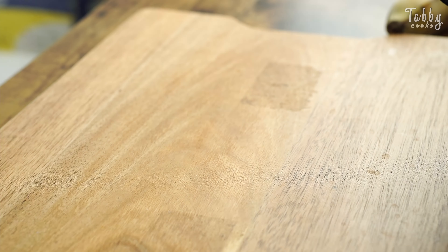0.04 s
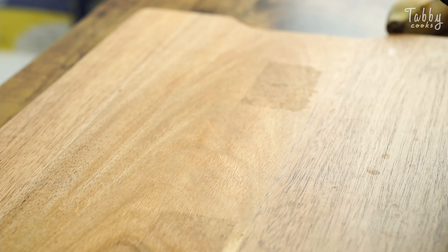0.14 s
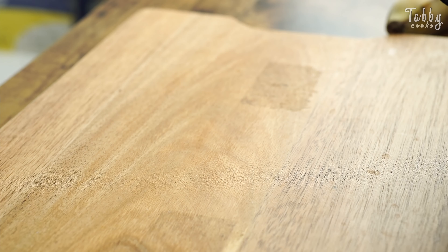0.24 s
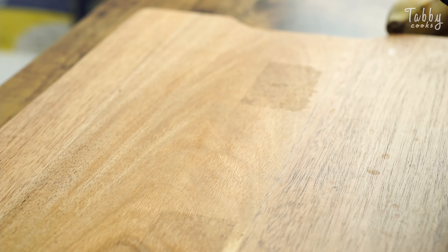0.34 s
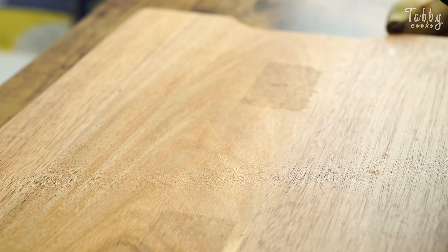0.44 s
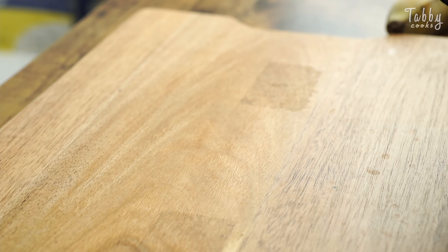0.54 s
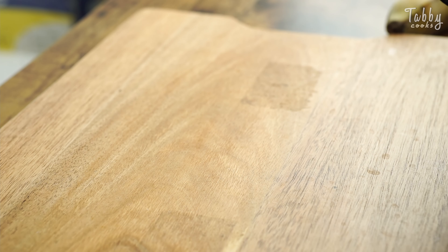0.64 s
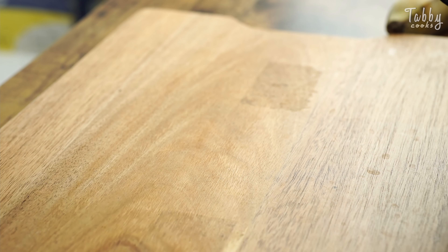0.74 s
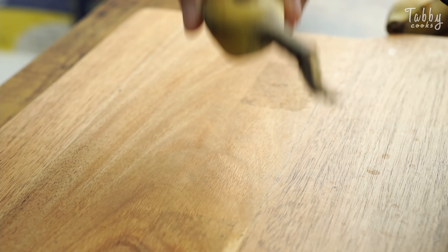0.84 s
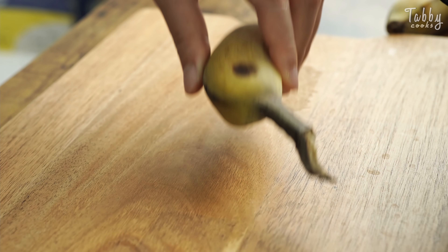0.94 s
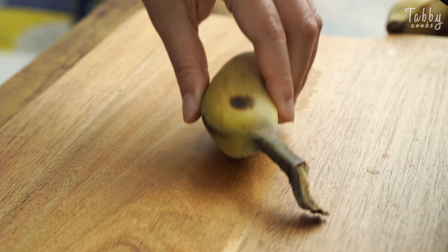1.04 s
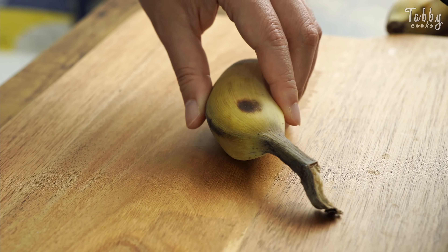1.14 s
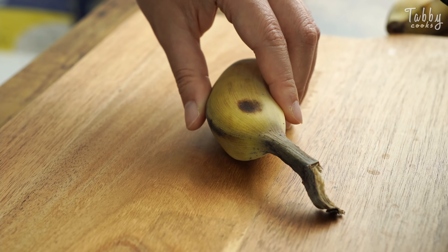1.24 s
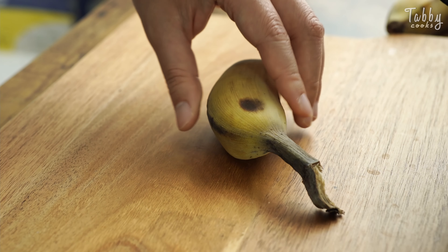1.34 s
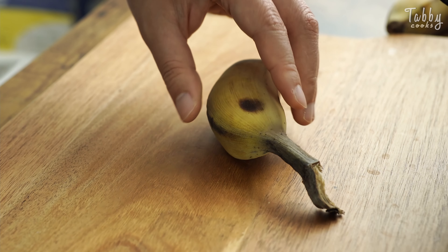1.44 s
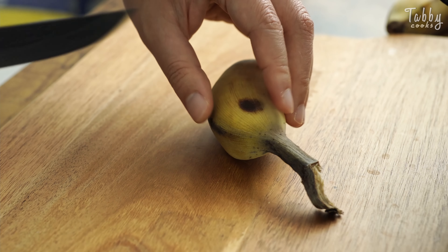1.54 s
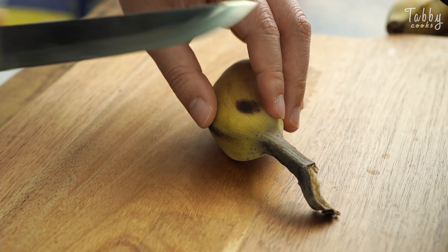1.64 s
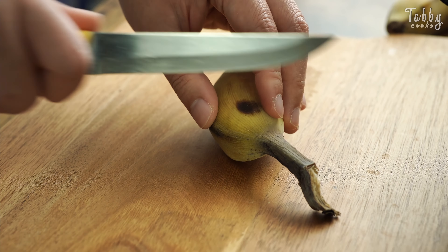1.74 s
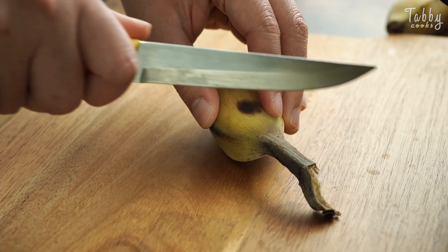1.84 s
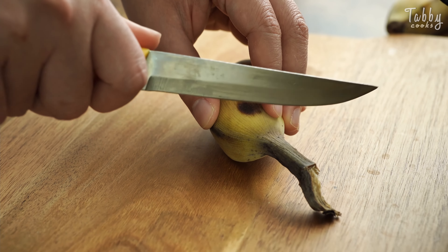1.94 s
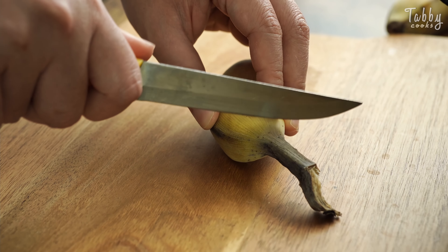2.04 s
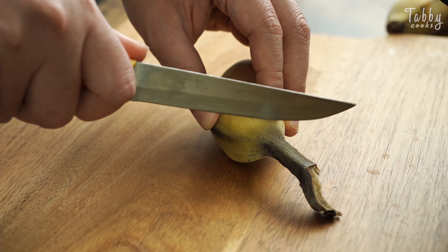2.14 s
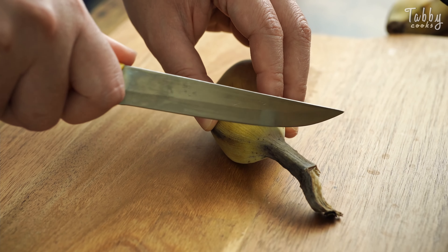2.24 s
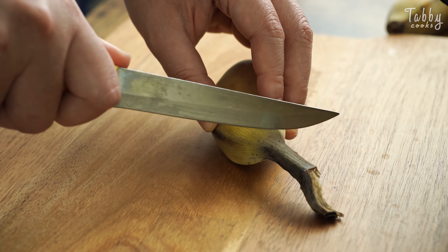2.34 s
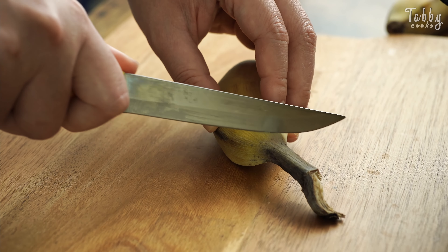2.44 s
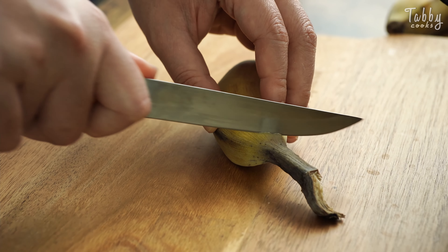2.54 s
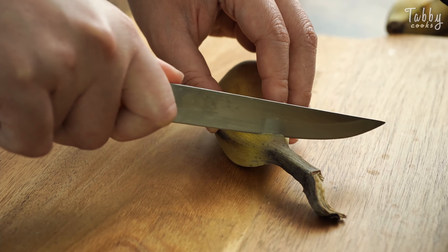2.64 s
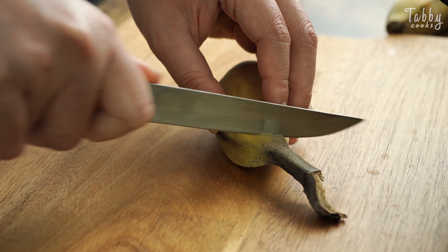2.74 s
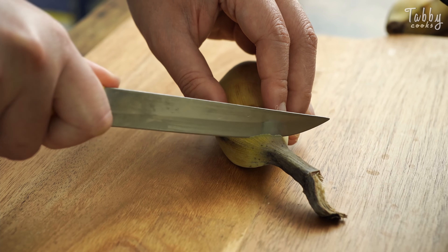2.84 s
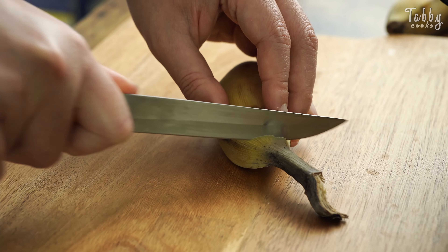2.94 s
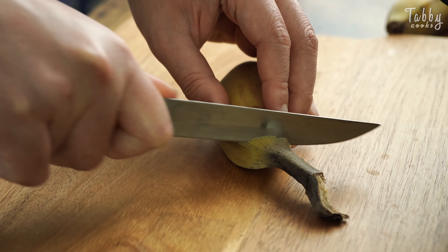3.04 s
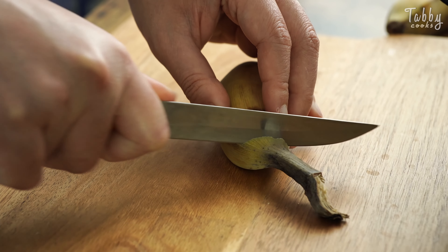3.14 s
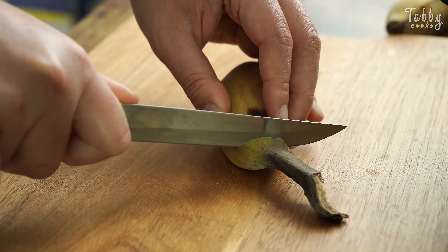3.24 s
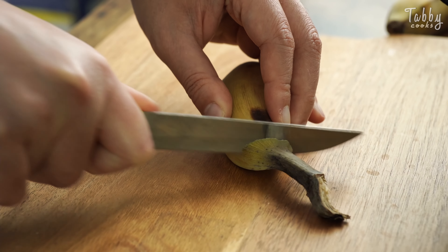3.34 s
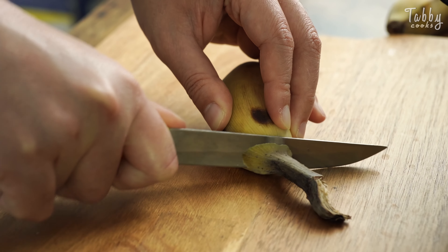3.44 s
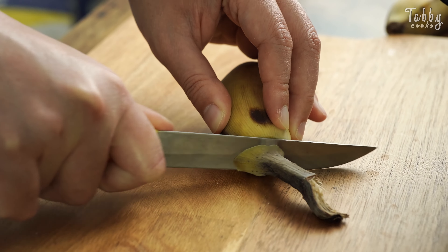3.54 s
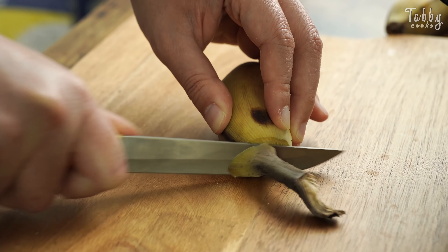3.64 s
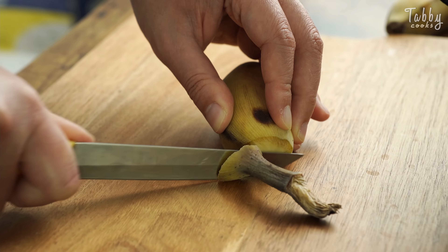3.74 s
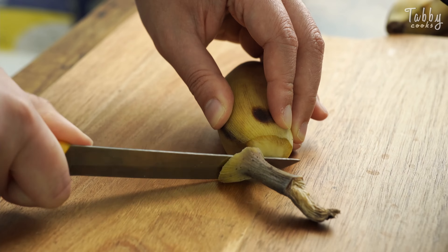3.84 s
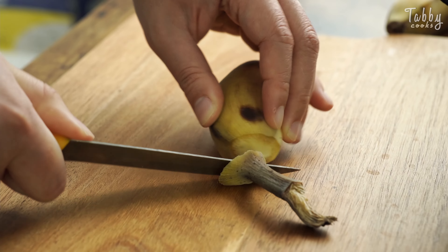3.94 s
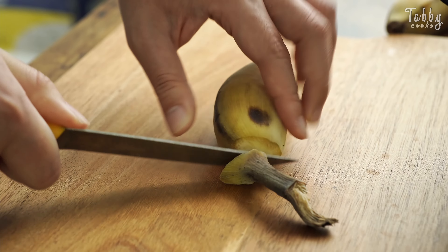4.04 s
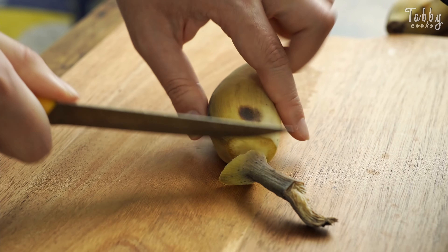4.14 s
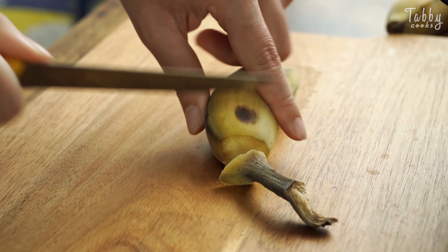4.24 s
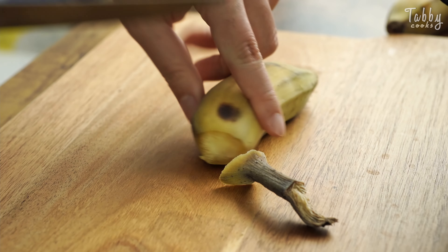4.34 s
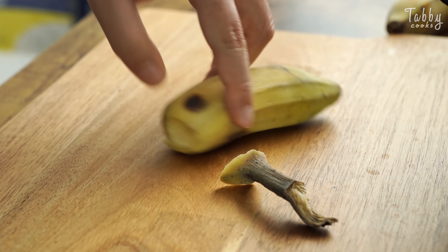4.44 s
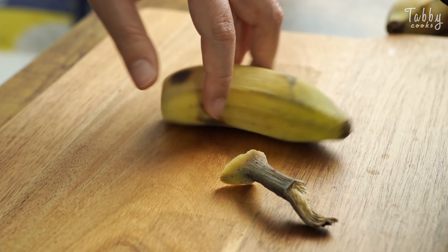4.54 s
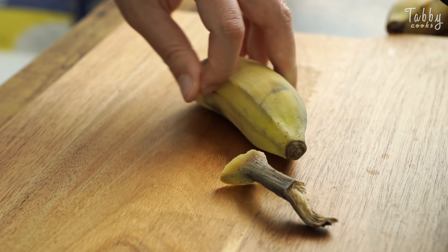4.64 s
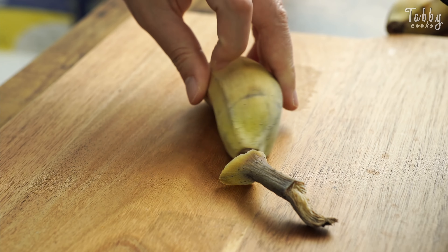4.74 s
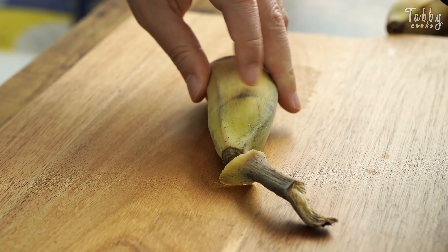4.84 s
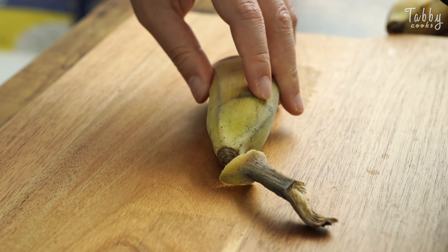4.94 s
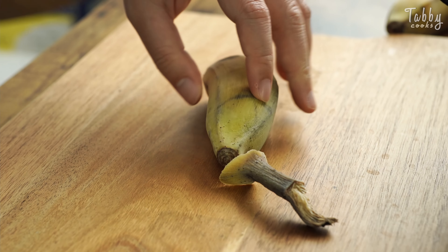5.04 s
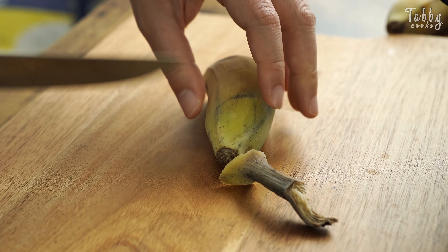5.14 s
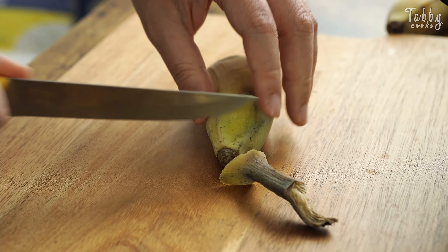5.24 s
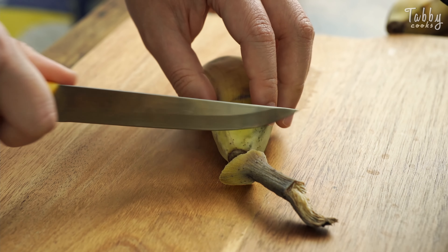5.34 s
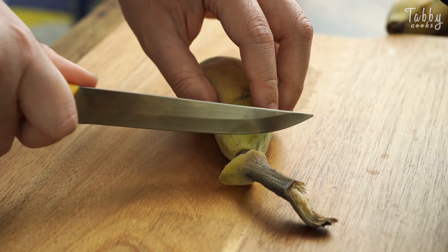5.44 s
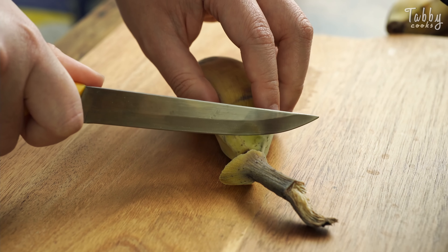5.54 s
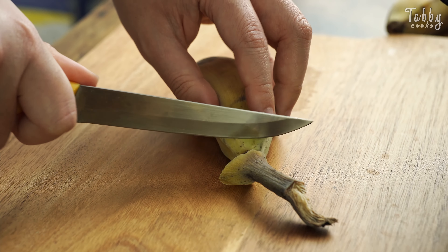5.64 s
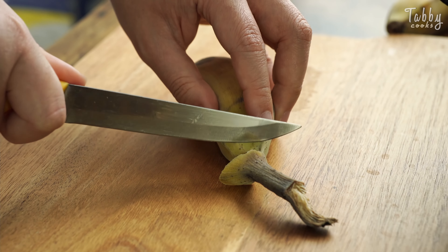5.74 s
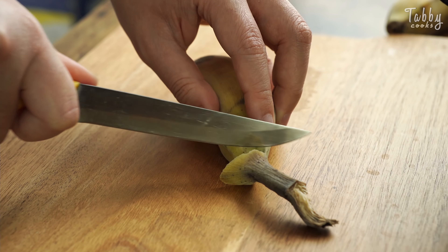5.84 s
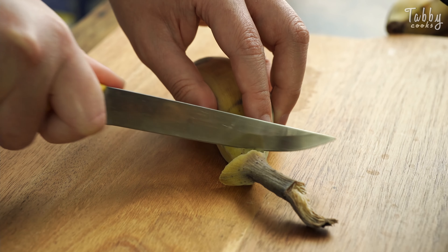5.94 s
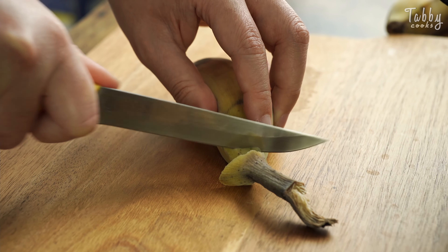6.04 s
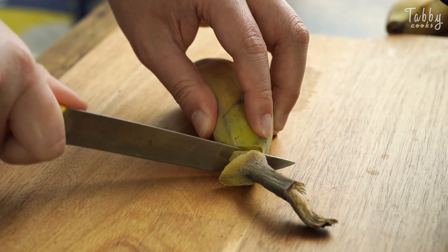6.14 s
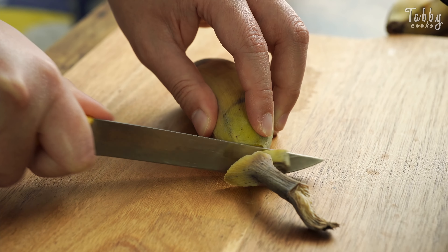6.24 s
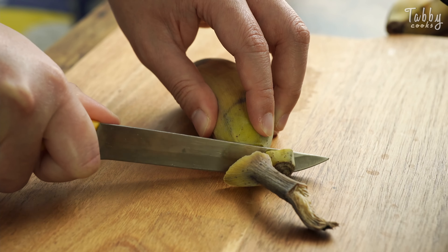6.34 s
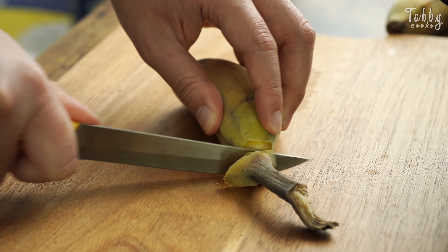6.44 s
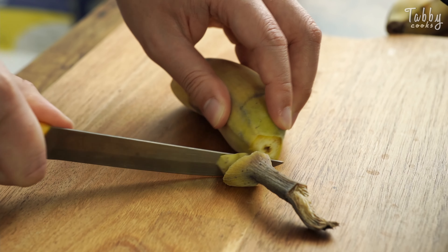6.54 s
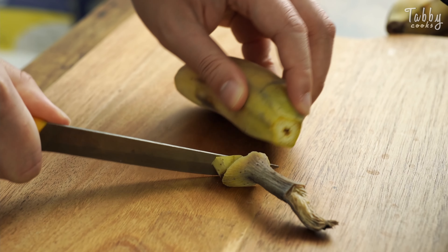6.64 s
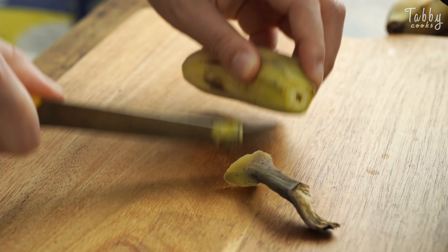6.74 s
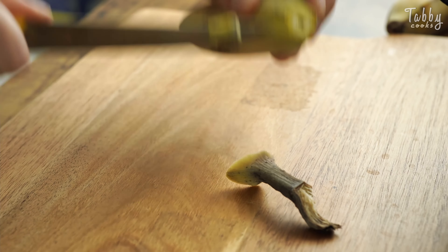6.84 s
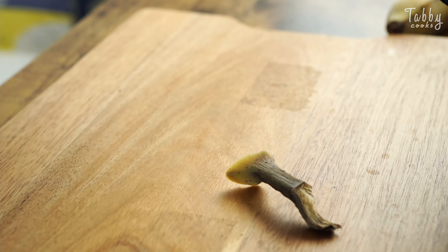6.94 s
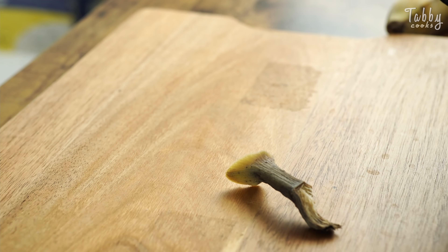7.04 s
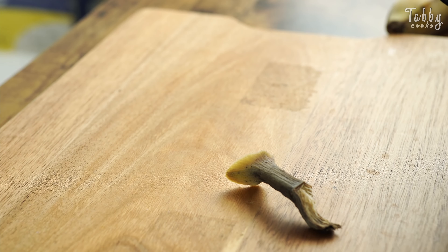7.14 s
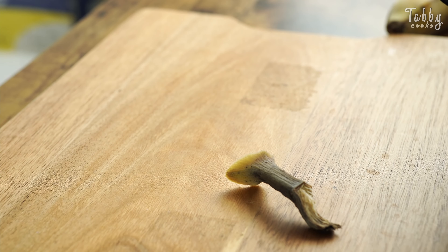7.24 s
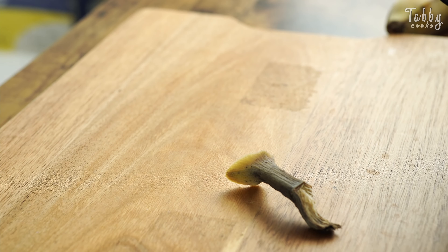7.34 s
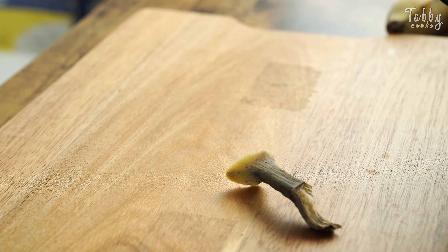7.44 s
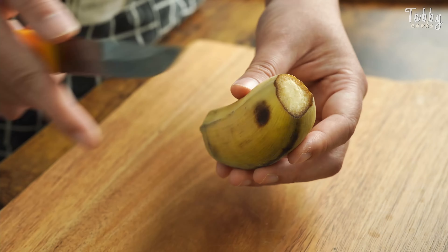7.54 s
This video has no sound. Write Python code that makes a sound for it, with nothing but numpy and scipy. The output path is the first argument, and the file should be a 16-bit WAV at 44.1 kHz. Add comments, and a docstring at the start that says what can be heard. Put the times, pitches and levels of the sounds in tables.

```python
"""Cutting the ends off a banana

A small banana is set on a wooden board, a kitchen knife saws off both ends, and it is turned between the cuts.
Filtered noise and jerky clicks make the blade rub and judder; short noise bursts are snapping fibres; clicks ring
the wood and steel as knocks. Slow sines sway the table that carries the microphone, over faint kitchen noise.
"""
import sys
import numpy as np
from scipy import signal
from scipy.fft import rfft, irfft, next_fast_len
from scipy.io import wavfile
from scipy.ndimage import uniform_filter1d

SR = 44100
rng = np.random.default_rng(int(sys.argv[2]) if len(sys.argv) > 2 else 0)


def unload_audio(sound):
    """Save the sound as a 16-bit wav file, at the path given as the first command line argument."""
    columns = np.transpose(np.atleast_2d(sound))
    # keep every value between -1 and 1, then stretch to whole-number steps
    steps = np.round(np.clip(columns, -1, 1) * 32767)
    wavfile.write(sys.argv[1], SR, steps.astype(np.int16))


N = 335160

# Modes (natural tones) of the wooden board. Each row: pitch in Hz, relative level in dB,
# longest time to fade by 60 dB in seconds; each use shortens it.
BOARD = [(202, -7.5, 0.057), (253, -0.5, 0.12), (310, -14.5, 0.09), (426, 2, 0.05), (500, -3.5, 0.083),
         (573, 2.5, 0.076), (631, -5.5, 0.046), (740, -6, 0.054)]
# Modes of the steel blade. Each row: pitch in Hz, relative level in dB,
# longest time to fade by 60 dB in seconds; each use shortens it.
BLADE = [(1222, -4, 0.04), (1806, -5.5, 0.043), (2068, -1, 0.034), (2440, 3, 0.01), (3320, -1.5, 0.019),
         (3960, -2.5, .03), (5150, -4.5, 0.01), (5994, 1, 0.024), (7500, -16.5, .03), (9100, -23, .02)]
# Lowest mode of the knife: pitch in Hz, relative level in dB, longest time to fade by 60 dB in seconds.
HANDLE = (565, 0, .025)


def amp(db):
    """Turns a level in dB into a plain multiplier."""
    return 10 ** (np.asarray(db) / 20)


def rms_one(x):
    """Scales a signal so that its average strength (rms) is 1."""
    return x / np.sqrt(np.mean(x ** 2) + 1e-20)


def in_time(rows):
    """Joins the rows of a table by straight lines, giving each column one value per sample."""
    s, *columns = np.transpose(rows)
    return [np.interp(np.arange(N) / SR, s, column) for column in columns]


def band(x, low_hz, high_hz):
    """Keeps mainly the pitches between two limits."""
    limits = [low_hz, min(high_hz, .45 * SR)]
    return signal.sosfilt(signal.butter(2, limits, "band", fs=SR, output="sos"), x)


def ring(x, hz, t60):
    """A resonance: a click of height 1 starts a sine near height 1 that fades by 60 dB in t60 seconds."""
    shrink = amp(-60 / (t60 * SR))
    turn = 2 * np.pi * hz / SR
    return signal.lfilter([0, np.sin(turn)], [1, -2 * shrink * np.cos(turn), shrink ** 2], x + 1e-18)


def ring_all(x, modes, t60_share):
    """Lets a signal ring every mode of a body; the share below 1 makes the ringing shorter."""
    return sum(amp(level_db) * ring(x, hz, t60_share * t60) for hz, level_db, t60 in modes)


def colour(x, spectrum):
    """Shapes noise to a spectrum by scaling each frequency; the result has rms 1."""
    hz, level_db = np.transpose(spectrum)
    f = np.arange(N // 2 + 1) * SR / N + 1
    gain_db = np.interp(np.log(f), np.log(hz), level_db, -90, -90)
    return rms_one(irfft(rfft(x) * amp(gain_db), N))


def grains(per_s, spread_db):
    """Random clicks of uneven size and sign, per_s of them a second on average; rms 1."""
    sizes = amp(spread_db * np.minimum(rng.exponential(1, N), 4)) * rng.choice([-1, 1], N)
    return rms_one(sizes * (rng.random(N) < per_s / SR))


def during(spans):
    """Is 1 inside the given time spans and 0 outside, with softened edges."""
    t = np.arange(N) / SR
    return uniform_filter1d(sum((t > start) & (t < end) for start, end in spans) * 1., size=400)


def stroke_levels():
    """Scrape, hiss and judder in dB: each stroke or tail rises, holds and falls, and their powers add."""
    # Rubbing strokes of blade, skin and fingers, and the noisy tails of knocks. Each row: start of hold,
    # rise, hold and fall in seconds, then scrape, hiss and judder level in dB during the hold.
    strokes = [(1.112, .004, 0.073, 0.072, -50, -60.5, -51.5), (1.61, 0.046, .02, 0.045, -61.5, -64.5, -64),
               (1.747, 0.22, 0.094, 0.16, -68, -68.5, -75), (2.08, 0.026, .004, 0.036, -68, -79, -55),
               (2.221, 0.043, .004, .01, -66, -65, -54), (2.502, 0.14, 0.16, 0.049, -56, -55, -54),
               (2.753, 0.038, 0.12, 0.052, -53.5, -53, -51), (2.945, .035, 0.058, 0.054, -57, -62, -41),
               (3.024, .03, 0.079, 0.045, -45, -43.5, -42),
               (3.204, 0.041, 0.055, 0.047, -44.5, -47.5, -40.5), (3.317, .03, .004, 0.019, -54, -55, -48),
               (3.367, 0.02, 0.0066, .03, -34.5, -40, -30), (3.39, 0.025, 0.042, 0.031, -27, -25.5, -16),
               (3.454, .008, .003, .012, -33, -40, -23), (3.465, 0.014, 0.0034, 0.025, -21, -44, -20.5),
               (3.484, .012, 0.029, 0.068, -36.5, -64, -43), (3.562, .012, 0.0011, 0.0067, -23.5, -65, -45),
               (3.599, 0.022, 0.0061, .03, -32, -51, -38.5), (3.622, .02, 0.028, .03, -37.5, -49, -41),
               (3.665, 0.054, .024, .02, -31, -41, -46), (3.702, .01, 0.046, 0.035, -28.5, -35.5, -35),
               (3.789, 0.029, 0.013, 0.031, -40.5, -35.5, -50),
               (3.825, 0.043, 0.27, 0.12, -60.5, -64, -60.5), (4.244, 0.081, 0.23, .06, -58, -55.5, -74.5),
               (4.475, 0.027, 0.036, .1, -57.5, -47.5, -61), (4.537, .1, 0.12, 0.069, -58, -49.5, -63),
               (4.747, 0.093, 0.0037, 0.11, -49.5, -48.5, -54), (4.832, 0.069, .004, 0.046, -60, -54, -82),
               (4.949, 0.066, 0.0026, 0.042, -57, -62, -59),
               (4.997, 0.032, 0.0023, 0.039, -58, -60.5, -72.5), (5.338, 0.16, .004, 0.13, -62, -63, -77.5),
               (5.595, 0.032, .045, 0.074, -63, -71, -54.5), (5.687, .1, 0.0056, 0.18, -59.5, -67, -64),
               (5.79, .08, 0.047, .1, -67.5, -81, -60.5), (5.957, 0.14, 0.0078, 0.039, -49, -56.5, -47),
               (5.997, 0.053, 0.0044, 0.057, -59, -57, -41), (6.053, .012, .003, .02, -70.5, -72, -45),
               (6.071, 0.0076, 0.0037, 0.02, -40.5, -52, -44),
               (6.115, 0.022, 0.044, 0.042, -30, -35.5, -23), (6.161, 0.03, 0.0056, 0.022, -25, -26, -24.5),
               (6.214, 0.012, 0.017, 0.041, -24.5, -55, -28.5), (6.25, .02, .004, 0.12, -32, -50, -42),
               (6.411, 0.012, .004, 0.037, -54.5, -51, -47), (6.468, 0.08, 0.11, .1, -44.5, -50, -48),
               (6.608, 0.036, 0.019, 0.061, -58, -70, -43.5), (6.683, 0.049, 0.0045, 0.12, -58.5, -66, -46),
               (6.735, 0.016, .015, 0.019, -39.5, -47, -50), (6.763, .02, .01, 0.21, -57, -67, -59)]
    swell_db = 25   # climb over one rise time, drop over one fall time
    resting_from_s, resting_db = 1.11, -76   # from here on fingers stay on the skin
    t = np.arange(0, N, 20) / SR
    power = np.tile(amp(2 * resting_db) * (t > resting_from_s) + 1e-12, (3, 1))
    for s, rise, hold, fall, *levels_db in strokes:
        below = np.maximum((s - t) / rise, 0) + np.maximum((t - s - hold) / fall, 0)
        power += amp(2 * (np.array(levels_db)[:, None] - swell_db * below))
    return [np.interp(np.arange(N) / SR, t, 10 * np.log10(p)) for p in power]


def flesh_slips():
    """Flesh sticks and lets go in uneven jerks; thick flesh passes on only their lower part."""
    # How the flesh slips. Each row: time in seconds, typical slips per second, muffled share from 0 to 1.
    slip_rows = [(3.3, 390, 0.3), (3.38, 280, 0.6), (3.44, 340, 0.6), (3.6, 420, .3), (6.05, 420, 0.2),
                 (6.11, 255, .3), (6.14, 340, 0.2), (6.165, 520, 0), (6.3, 560, 0.2)]
    per_s, muffled = in_time(slip_rows)
    muffled = np.clip(muffled, 0, 1)
    uneven = np.repeat(rng.normal(0, 1, (2, N // 100 + 1)), 100, axis=1)[:, :N]
    count = np.floor(np.cumsum(per_s * np.exp(.3 * uneven[0])) / SR)   # every new whole number is a slip
    slips = np.diff(count, prepend=0) * amp(3 * np.clip(uneven[1], -2, 1.5))
    slips = band(slips, 72, 1100)   # soft flesh lets go slowly
    return (1 - muffled) * slips + muffled * amp(4.5) * band(slips, 150, 470)


def rubbing():
    """Sliding noise excites the blade, sawn skin makes it gritty, and slipping flesh judders the board."""
    # The blade is inside the skin. Each row: start in seconds, end in seconds.
    sawing_spans = [(2.899, 3.46), (3.549, 3.62), (5.941, 6.19)]
    # Hard contact with the board. Each row: start in seconds, end in seconds.
    wood_spans = [(1.1, 1.15), (3.466, 3.55), (3.66, 3.78), (6.2, 6.62), (6.72, 6.85)]
    # Tone of the scrape. Each row: frequency in Hz, relative level in dB per Hz.
    scrape_spectrum = [(500, -23), (900, -2), (1500, -2.5), (2500, 2), (4000, 2.5), (5500, -3.5),
                       (8000, -42.5)]
    # Tone of the hiss. Each row: frequency in Hz, relative level in dB per Hz.
    hiss_spectrum = [(3500, -19.5), (5500, -1.5), (7000, -2), (9000, -6), (12000, -6.5), (15800, -12)]
    flutter_hz, flutter_db = 35.8, 1.5   # unevenness of scrape and hiss
    scrape_db, hiss_db, judder_db = stroke_levels()
    sawing, on_wood = during(sawing_spans), during(wood_spans)

    # Louder sawing has more grit, and each tear is a short puff of noise.
    grit = sawing * np.clip((scrape_db + 57) / 18, 0, .9)
    tears = signal.lfilter([1], [1, -.96], np.abs(grains(900, 6.1)))
    tears = rms_one(tears * rng.standard_normal(N))
    smooth = np.sqrt(1 - grit) * rng.standard_normal((2, N))
    gritty = np.sqrt(grit) * tears
    low, high = smooth[0] + gritty, smooth[1] - gritty

    steel = sum(amp(level_db) * ring(low, hz, .5 * t60) / np.sqrt(t60) for hz, level_db, t60 in BLADE)
    ringing = amp(-8 + 16 * on_wood)   # flesh and fingers damp the modes, bare wood lets them ring
    scrape = colour(low, scrape_spectrum) + ringing * rms_one(steel)
    scrape = scrape / np.sqrt(1 + ringing ** 2)
    hiss = colour(high, hiss_spectrum)

    judder = ring_all(flesh_slips(), BOARD, 0.55)
    drone = ring(low, HANDLE[0], 0.014) + amp(-5) * ring_all(low, BOARD, 0.064)
    # Mere sliding only hums in knife and board.
    judder = sawing * rms_one(judder) + (1 - sawing) * rms_one(drone)
    wobble = rms_one(band(rng.standard_normal(N), flutter_hz / 2, flutter_hz * 2))
    flutter = amp(flutter_db * wobble)
    return flutter * (amp(scrape_db) * scrape + amp(hiss_db) * hiss) + amp(judder_db) * judder


def snaps():
    """Each fibre gives a bright crack, a short ring at its own pitch and a nudge to blade and board."""
    # Fibres snapping. Each row: start in seconds, relative peak level in dB, pitch in Hz,
    # brightness (crack against tone) in dB.
    snap_rows = [(1.1095, -27.5, 1700, -23), (1.12, -35, 1650, -14), (2.08, -29.5, 4000, 6.5),
                 (2.8683, -34, 4600, -8), (2.9161, -38.5, 1780, 1), (2.9483, -23.5, 6100, -9),
                 (2.96, -24, 3320, -2), (2.9841, -19.5, 3440, 6.5), (3.0134, -17.5, 10290, 3),
                 (3.0248, -15, 3800, -1.5), (3.0369, -15.5, 3240, 8), (3.0659, -20, 3670, -4),
                 (3.085, -19, 3490, 1), (3.193, -27, 4570, -1), (3.2137, -4.5, 9300, 2),
                 (3.254, -8.5, 3930, 5), (3.2817, -16.5, 4260, -18), (3.286, -16, 3600, -1.5),
                 (3.3511, -14.5, 4270, 3.5), (3.3677, -4.5, 3640, -0.5), (3.3856, 4.5, 3420, 9.5),
                 (3.389, -11, 11330, 4), (3.4017, -4, 5205, -21), (3.412, -6.5, 5333, -16),
                 (3.418, -8, 5170, -15), (3.4264, -5.5, 5120, -2), (3.4533, 1, 5440, -25),
                 (3.4649, 2, 2600, -17), (3.4783, -17.5, 2500, 0), (3.556, -4, 2410, 4),
                 (3.5879, -7.5, 2252, 1.5), (3.6007, -6.5, 2176, 24), (3.6245, -19, 2130, -17),
                 (3.6327, -24, 2260, -17), (3.6425, -15, 2370, -12), (3.658, -12.5, 4020, -12),
                 (3.6597, -12, 3960, 5), (3.671, -9.5, 5560, -18), (3.681, -12.5, 5100, -15.5),
                 (3.6906, -12, 2500, -23), (3.6995, -5, 3440, 0), (3.7397, -10.5, 3400, -12),
                 (3.7416, -6, 3660, -28), (3.788, -18.5, 5934, -16), (4.958, -46, 2339, -5),
                 (5.671, -39, 2170, -2), (5.9972, -27, 3100, -5.5), (6.013, -33, 3144, -4),
                 (6.0702, -24, 3763, 6), (6.088, -23, 3370, -2), (6.1046, -20, 3600, -12),
                 (6.116, -14.5, 2873, -13), (6.1247, -20, 3830, -9), (6.1587, -9.5, 2174, -17),
                 (6.2003, -25, 5990, -28), (6.2163, -0.5, 2950, -22), (6.4066, -31, 10500, -7)]
    length = 600   # samples in one snap
    out, nudges, t = np.zeros(N + length), np.zeros(N), np.arange(length) / SR
    for s, level_db, hz, bright_db in snap_rows:
        noise = rng.standard_normal(length)
        crack = band(noise * np.exp(-t / 0.00043), 6500, 12500)
        tone = band(noise * np.exp(-t / 0.0023), hz / 1.26, hz * 1.203)
        wide = band(noise * np.exp(-t / 0.0022), 1200, 8000)
        snap = amp(bright_db) * rms_one(crack) + rms_one(tone) + amp(-3.5) * rms_one(wide)
        i = round(s * SR)
        out[i:i + length] += amp(level_db - 4.0) * snap / np.abs(snap).max()
        nudges[i] = amp(level_db - 25)
    steel = amp(-2.5) * ring_all(nudges, BLADE, 0.1)
    wood = ring_all(nudges, BOARD, 0.17)
    return out[:N] + steel + wood


def knocks():
    """Each knock strikes the modes of board and blade unevenly; a soft one reaches only the low modes."""
    # Knocks on the board. Each row: start in seconds, relative level in dB, extra level of the blade
    # edge in dB, reach (the pitch where the blow has halved) in Hz.
    knock_rows = [(1.1083, -31, 9, 2960), (1.1179, -14.5, -16, 680), (3.4643, -9.5, 12.5, 9220),
                  (5.594, -35.5, -12, 914), (6.2164, -12.5, 18, 9000)]
    s, level_db, edge_db, reach_hz = np.transpose(knock_rows)
    at, out = np.round(s * SR).astype(int), np.zeros(N)
    luck_db = rng.normal(0, 1.1, (len(at), len(BOARD) + len(BLADE)))
    strikes = [(mode, level_db - 7.5) for mode in BOARD]
    strikes += [(mode, level_db + edge_db - 13.0) for mode in BLADE]
    for k, ((hz, mode_db, t60), blow_db) in enumerate(strikes):
        clicks = np.zeros(N)
        strength = amp(blow_db + mode_db + luck_db[:, k])
        clicks[at] = strength * (-1) ** k / (1 + (hz / reach_hz) ** 2)
        out += ring(clicks, hz, 0.61 * t60)
    return out


def flicks():
    """The blade drags sideways over the wood for an instant: a swell of chatter into its modes."""
    # Sideways flicks. Each row: centre in seconds, half width (one standard deviation) in seconds,
    # relative level in dB, extra level of the blade modes in dB, reach (pitch where it has halved) in Hz.
    flick_rows = [(4.028, 0.0034, -31, 2.5, 1470), (4.183, 0.0015, -55, 9.5, 4020),
                  (4.376, 0.0053, -62.5, 18.5, 2600), (4.745, 0.017, -53, 13.5, 1410),
                  (6.741, 0.0076, -16, -7.5, 3440)]
    t, chatter, out = np.arange(N) / SR, grains(6000, 0.98), np.zeros(N)
    for k, (hz, mode_db, t60) in enumerate([HANDLE] + BLADE):
        swell = np.zeros(N)
        for s, width, level_db, treble_db, reach_hz in flick_rows:
            height = amp(level_db + (treble_db if k else 0))   # the first mode is the handle
            swell += height * np.exp(-.5 * ((t - s) / width) ** 2) / (1 + (hz / reach_hz) ** 2)
        out += amp(mode_db - 26.5) * ring(swell * chatter, hz, 0.94 * t60)
    return out


def kitchen(x):
    """Echoes of the room: eight feedback delays, quieter and duller on every round."""
    t60_s, wall_cut_hz = 0.3, 3900   # fading time by 60 dB at the lowest pitches, start of the dulling
    size = next_fast_len(N + SR)
    w = 2 * np.pi * np.arange(size // 2 + 1) / size
    dull = 1 / np.sqrt(1 + (w * SR / (2 * np.pi * wall_cut_hz)) ** 2)
    response = 0
    for k, lag in enumerate(rng.uniform(0.0096, .03, 8) * SR):
        one_round = amp(-60 * lag / SR / t60_s) * dull ** 0.43 * np.exp(-1j * w * round(lag))
        response = response + (-1) ** k * one_round / (1 - one_round)   # all rounds added up
    return irfft(rfft(x, size) * response, size)[:N]


def bumps():
    """A soft weight meets the wood: a low push that dies fast and leaves table top and frame humming."""
    # Fruit and hands bump or rock on the wood. Each row: start in seconds, starting level of the push in dB,
    # pitch in Hz, time to fade by 60 dB in seconds, hum of the top in dB, tone of the frame in dB.
    bump_rows = [(1.106, -37, 59.1, 0.013, -74, -63), (1.118, -3.5, 79, 0.051, -31, -27),
                 (2.217, -25.5, 103, 0.062, -45, -37), (2.217, -21.5, 258, 0.022, -49, -60),
                 (2.74, -45, 70, .06, -63, -37), (3.4, -19, 91, 0.2, -28, -36),
                 (4.155, -28, 79, 0.13, -62.5, -45), (4.224, -28.5, 95.9, 0.14, -59, -39),
                 (4.742, -29, 60, 0.059, -62, -30.5), (4.954, -33, 72.3, 0.16, -72.5, -39.5),
                 (5.475, -32.5, 100.6, 0.033, -62.5, -55), (6.16, -18.5, 59, 0.12, -32.5, -25),
                 (6.218, -31, 70.7, 0.095, -64, -50), (7.572, -21, 70.1, 0.037, -52, -45)]
    top_hz, top_t60_s = 153.5, .5
    frame_hz, frame_t60_s = 42, .65
    out, t = np.zeros(N), np.arange(N) / SR
    for s, level_db, hz, t60, hum_db, frame_db in bump_rows:
        u = np.clip(t - s, 0, 1)   # seconds since the bump
        onset = 1 - np.exp(-u / 0.0038)
        out -= amp(level_db - 60 * u / t60) * onset * np.sin(2 * np.pi * hz * u)
        out += amp(hum_db - 60 * u / top_t60_s) * np.sin(2 * np.pi * top_hz * u)
        out += amp(frame_db - 60 * u / frame_t60_s) * np.sin(2 * np.pi * frame_hz * u) * (u < 1)
    return out


def table():
    """The table sways throughout; each jolt twists the legs, shakes the top and sends a rumble through the frame."""
    # Main sway of the table. Each row: time in seconds, level (rms) in dB.
    sway = [(0.0, -48), (0.3, -34), (0.7, -51.5), (0.92, -31.5), (1.12, -50), (1.25, -24.5), (1.5, -15),
            (1.75, -33), (2.0, -25.5), (2.4, -26.5), (2.87, -7), (3.22, -2), (3.62, -12), (3.9, -5),
            (4.15, -5.5), (4.47, -18.5), (4.7, -13.5), (5.15, -19), (5.38, -27), (5.7, -16.5), (5.9, -32.5),
            (6.22, -6.5), (6.38, -11), (6.65, -3.5), (6.95, -19.5), (7.15, -13), (7.6, -31.5)]
    # Hands lean on or jolt the table. Each row: start in seconds, twist of the legs in dB (rms at its height),
    # shake of the top in dB (likewise), pitch of the shake in Hz, rumble in dB.
    jolts = [(0.3, -65, -55, 29.7, -77), (0.58, -42.5, -63, 28.2, -74), (1.16, -27.5, -23, 27.06, -44),
             (1.66, -55, -38, 27.3, -68), (2.021, -55, -41, 25.8, -65), (2.26, -51, -36, 25.6, -54.5),
             (2.681, -20, -31.5, 26.5, -51), (2.952, -30, -21, 28.8, -44), (3.3, -26, -19.5, 30, -37),
             (3.578, -17.5, -12.5, 28.87, -40), (3.969, -30.5, -23.5, 29.4, -56),
             (4.261, -51.5, -27, 26.86, -51.5), (4.789, -25, -23, 28.1, -62.5),
             (5.051, -37.5, -35.5, 28.5, -61), (5.42, -30, -38, 26.4, -56.5), (5.7, -31, -40.5, 26, -60),
             (6.15, -22, -12.5, 26.56, -39.5), (6.401, -35, -27, 26.5, -50.5),
             (6.681, -31, -26.5, 28.3, -55), (6.951, -34.5, -35, 27.5, -61.5),
             (7.3, -46.5, -40.5, 26.1, -67.5)]
    sway_hz, twist_hz = 10.0, 16.3
    rises_s = .16, 0.11, 0.068   # time to the height of twist, shake and rumble
    rumble_floor_db = -66.5
    t = np.arange(0, N, 20) / SR
    sway_level = uniform_filter1d(amp(np.interp(t, *np.transpose(sway))), size=150)
    motion = sway_level * np.sin(2 * np.pi * sway_hz * t)
    rumble_power = amp(2 * rumble_floor_db)
    for s, twist_db, shake_db, shake_hz, rumble_db in jolts:
        u = np.maximum(t - s, 0)   # seconds since the jolt
        twist, shake, swell = ((u / rise * np.exp(1 - u / rise)) ** 2 for rise in rises_s)
        motion += amp(twist_db) * twist * np.sin(2 * np.pi * twist_hz * t)
        motion += amp(shake_db) * shake * np.sin(2 * np.pi * shake_hz * u)
        rumble_power = rumble_power + (amp(rumble_db) * swell) ** 2
    # Back from every 20th sample to all samples.
    motion, rumble = (uniform_filter1d(np.interp(np.arange(N) / SR, t, x), size=40)
                      for x in (motion, np.sqrt(rumble_power)))
    rumble_noise = rms_one(band(rng.standard_normal(N), 51, 110))
    total = np.sqrt(2) * motion + bumps() + rumble * rumble_noise
    return total / (1 + (total / .93) ** 8) ** (1 / 8)   # soft limit keeps the table motion below full scale


def room_air():
    """The faint kitchen background: steady noise, strongest in the bass."""
    # Tone of the background. Each row: frequency in Hz, relative level in dB per Hz.
    air_spectrum = [(21, -32), (35, 1.5), (132, -13.5), (167, -9.5), (189, -31.5), (221, -16), (359, -23.5),
                    (440, -20), (554, -19.5), (1360, -23), (1460, -24.5), (1710, -24), (5000, -37.5),
                    (15800, -47)]
    return amp(-59.5) * colour(rng.standard_normal(N), air_spectrum)


def scene():
    """Adds the cutting, the echoes of its hits, the table motion and the room air."""
    hits = snaps() + knocks() + flicks()
    echoes = amp(-24.5) * kitchen(hits)
    cutting = rubbing() + hits + echoes
    return (cutting + table() + room_air())[None]


def record(dry):
    """Clips peaks beyond full scale, then removes the treble from 16300 Hz up."""
    clipped = np.clip(dry, -1, 1)
    return signal.sosfilt(signal.cheby2(24, 60, 16300, fs=SR, output="sos"), clipped)


dry = scene()
out = record(dry)
unload_audio(out)
```